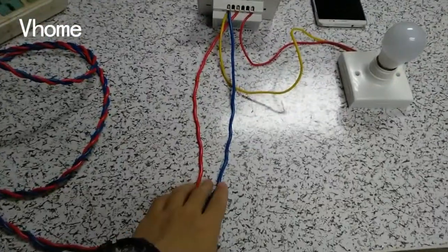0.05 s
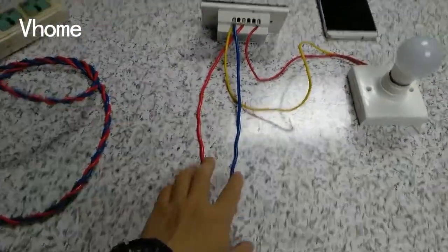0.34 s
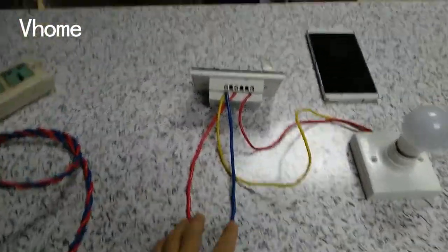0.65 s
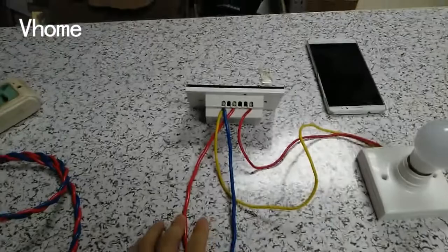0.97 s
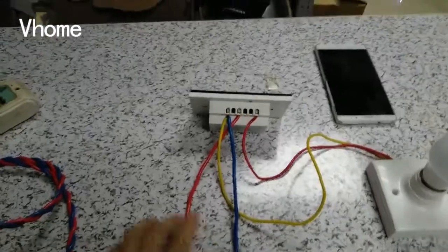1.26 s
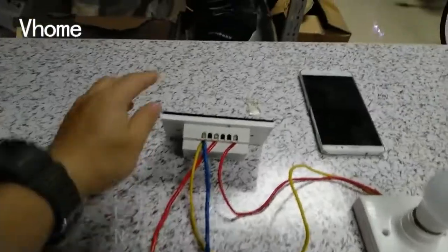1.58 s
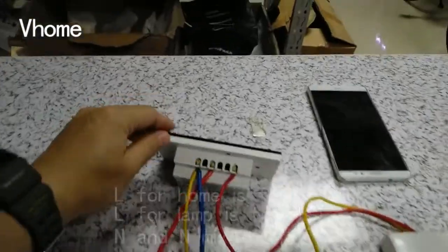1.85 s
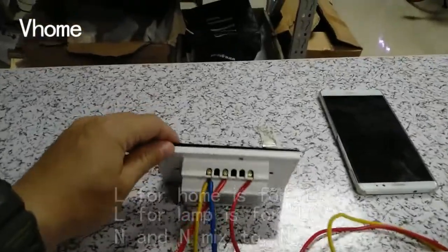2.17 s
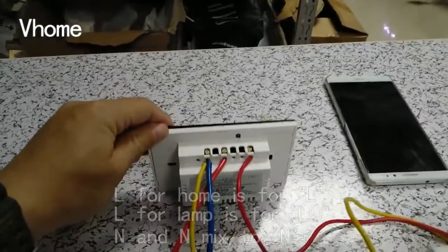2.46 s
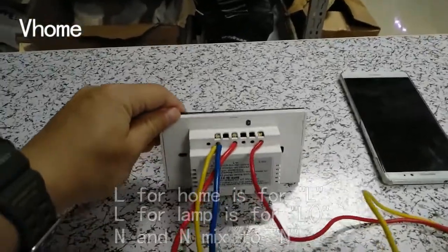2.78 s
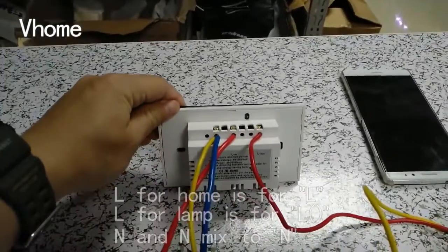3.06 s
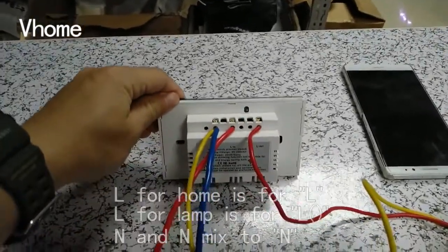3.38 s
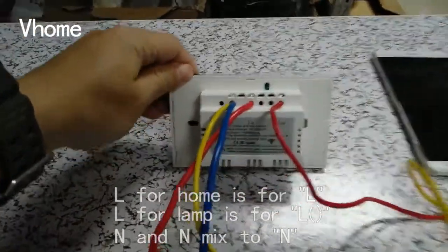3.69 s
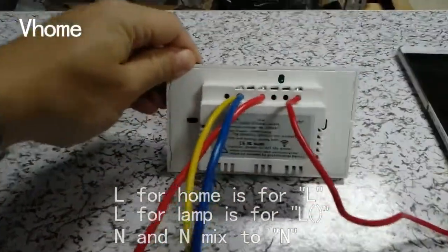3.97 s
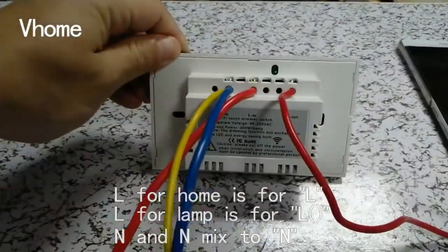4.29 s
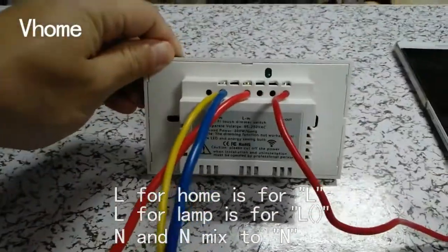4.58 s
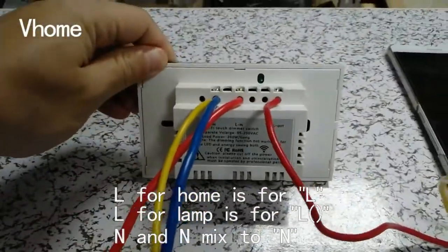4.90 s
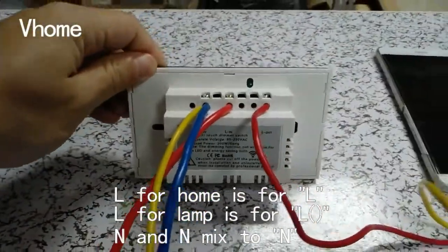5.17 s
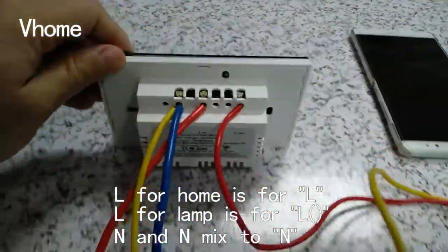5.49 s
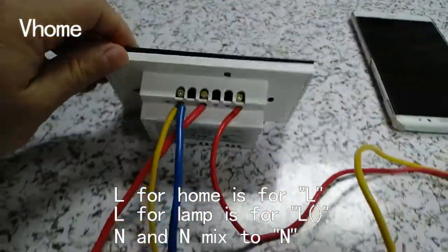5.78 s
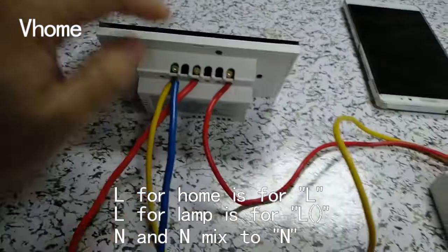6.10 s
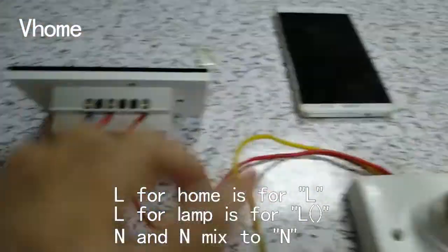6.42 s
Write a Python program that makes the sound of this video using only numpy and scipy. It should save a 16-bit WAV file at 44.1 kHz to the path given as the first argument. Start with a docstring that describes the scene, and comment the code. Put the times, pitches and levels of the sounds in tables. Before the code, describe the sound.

A wired plastic wall switch is handled on a stone countertop. A few sharp ticks and light clacks come first, then fingers brush softly over the wires. The plate drags and knocks as it is tipped up. Near the end it is set down with a louder clacking knock, followed by one bright click. The sounds are close, over a low room rumble, high hiss and a faint whine.

```python
"""A quiet room with a stone countertop, a stereo pair of microphones close to the stone.
A wired plastic wall switch is tipped up and set back down: its plate drags, clacks and knocks on the
counter, fingers rustle over the wires, and the stressed plastic gives tiny bright ticks.
Behind it: the rumble of the room, a band of high hiss and a faint whine that comes and goes."""
import sys
import numpy as np
from scipy import signal
from scipy.fft import rfft, irfft, next_fast_len
from scipy.io import wavfile
from scipy.ndimage import uniform_filter1d

SR = 44100
rng = np.random.default_rng(int(sys.argv[2]) if len(sys.argv) > 2 else 0)


def dump_mix(stems):
    """Bounce the given channels to the path in sys.argv[1] as a 16-bit WAV at rate SR."""
    frames = np.atleast_2d(stems).T  # one column per channel
    limited = np.clip(frames, -1, 1)  # hard clip at full scale
    pcm = np.round(limited * 32767).astype(np.int16)
    wavfile.write(sys.argv[1], SR, pcm)


N = 284445

# how alike the room sounds at the two microphones: (frequency [Hz], coherence [0..1])
ROOM_COHERENCE = [(30, 0.049), (60, 0.86), (130, 0.96), (290, 0.98), (640, 0.11), (1400, 0.057)]


def gain_of(db):
    """Decibels to amplitude."""
    return 10 ** (np.asarray(db) / 20)


def unit_rms(x):
    """Scales to rms 1."""
    return x / np.sqrt(np.mean(x ** 2) + 1e-20)


def curve_at(points, hz):
    """Reads a table on a log-frequency axis."""
    f, value = np.transpose(points)
    return np.interp(np.log(hz + 1), np.log(f + 1), value)


def pan(balance_db):
    """Left and right gains; a positive balance leans left."""
    return gain_of(np.array([[.5], [-.5]]) * balance_db)


def add(mix, start_s, sound):
    """Mixes a stereo sound in at start_s."""
    part = mix[:, round(start_s * SR):][:, :sound.shape[1]]
    part += sound[:, :part.shape[1]]


def coloured(x, colour):
    """Gives x a spectrum, at rms 1."""
    size = next_fast_len(x.shape[1])
    gain = gain_of(curve_at(colour, np.fft.rfftfreq(size, 1 / SR)))
    return unit_rms(irfft(rfft(x, size) * gain, size)[:, :x.shape[1]])


def resonance(x, hz, width_hz):
    """Passes x through a steep-sided resonance, at rms 1."""
    for _ in range(3):
        x = signal.lfilter(*signal.iirpeak(hz, hz / width_hz, fs=SR), x)
    return unit_rms(x)


def drift(per_s):
    """Slow random wander of rms 1."""
    knots = np.arange(0, N / SR + 1, 1 / per_s)
    return unit_rms(np.interp(np.arange(N) / SR, knots, rng.standard_normal(len(knots))))


def stroke(peak_s, half_length_s, rise=0.91, fall=1.02):
    """The swell of one stroke, which bites a little faster than it trails off."""
    t = np.arange(N) / SR - peak_s
    return np.exp(-.5 * (t / (half_length_s * np.where(t < 0, rise, fall))) ** 2)


def strokes(rows):
    """The envelope of several strokes, added in power."""
    return np.sqrt(sum((gain_of(db) * stroke(s, half_length)) ** 2 for s, db, half_length in rows))


def friction(colour, patchy_db, grain_db, patch_bins):
    """A fine-grained rub whose frequency bands swell and fade at random."""
    spectra = signal.stft(rng.standard_normal((2, N)), nperseg=512)[2]
    patches = uniform_filter1d(rng.standard_normal(spectra.shape[1:]), size=patch_bins, axis=0)
    patches = unit_rms(uniform_filter1d(patches, size=14, axis=1))
    rub = signal.istft(spectra * gain_of(patchy_db * np.tanh(patches)))[1][:, :N]
    return coloured(rub * gain_of(grain_db * drift(300)), colour)


def room_rumble(level_db=-54):
    """The steady air of the room, alike at both microphones in the bass only."""
    # room tone: (frequency [Hz], relative level [dB])
    colour = [(12, -72), (22, -61), (45, -13), (65, -19.5), (86, -4), (107, -12.5), (134, 1.5), (167, -4.5),
              (196, 2), (226, -4), (271, -3), (306, -1.5), (528, -12.5), (967, -11.5), (2080, -32),
              (2500, -37), (3250, -70), (5500, -120)]
    size = next_fast_len(N)
    left, other = rfft(rng.standard_normal((2, size)))
    coherence = curve_at(ROOM_COHERENCE, np.fft.rfftfreq(size, 1 / SR))
    right = coherence * left + np.sqrt(1 - coherence ** 2) * other
    pair = irfft(np.array([left, right]), size)[:, :N]
    return gain_of(level_db) * coloured(pair, colour) * pan(-1.45)


def hiss_and_whine(whine_hz=8001, flicker_db=1.5, wander_db=0.6, waver_db=2):
    """A flickering band of high hiss, left of centre, with a thin wavering whine in it."""
    # band of the hiss: (frequency [Hz], relative level [dB])
    colour = [(2000, -66), (5000, -71), (6000, -9), (7000, 6), (8000, 14.5), (9000, 13), (10000, 11),
              (10700, 2), (11500, -39), (15000, -59)]
    # slow rise and fall of each: (time [s], level [dB])
    hiss_levels = [(0, -51), (0.05, -58), (0.12, -54.5), (0.35, -55), (0.65, -59.5), (0.9, -54), (1.6, -56),
                   (1.75, -55), (2.25, -53), (2.43, -59), (2.52, -52.5), (2.7, -56), (3.5, -55.5),
                   (3.8, -56), (4.3, -56.5), (4.7, -57), (5.35, -54.5), (5.7, -54), (6.05, -57.5),
                   (6.45, -56)]
    whine_levels = [(0, -63), (0.6, -71), (0.95, -69), (1.3, -66), (2.1, -70), (2.6, -65), (3.3, -79),
                    (3.8, -77), (4.4, -71), (4.9, -68), (6.0, -89), (6.4, -62)]
    t = np.arange(N) / SR
    hiss_db = np.interp(t, *np.transpose(hiss_levels)) + flicker_db * drift(20) + wander_db * drift(6)
    whine_db = np.interp(t, *np.transpose(whine_levels)) + waver_db * drift(6.7)
    hiss = gain_of(hiss_db) * coloured(rng.standard_normal((2, N)), colour) * pan(4)
    return hiss + gain_of(whine_db) * np.sqrt(2) * np.sin(2 * np.pi * whine_hz * t)


def room_tail(x):
    """The room answers with sparse reflections of random sign, each band dying at its own speed."""
    # reverberation time: (frequency [Hz], t60 [s])
    decay = [(100, 0.31), (300, 0.2), (1000, 0.48), (4000, 0.51), (10000, 0.073)]
    taps = np.zeros((2, SR // 2))
    slots = np.arange(300, SR // 2 - 20, 20)
    arrivals = slots + rng.integers(0, 20, (2, len(slots)))
    np.put_along_axis(taps, arrivals, rng.choice([-1., 1.], arrivals.shape), 1)
    hz, t, spectra = signal.stft(taps, SR, nperseg=256)
    coherence = curve_at(ROOM_COHERENCE, hz)[:, None]
    spectra[1] = coherence * spectra[0] + np.sqrt(1 - coherence ** 2) * spectra[1]
    tail = signal.istft(spectra * gain_of(-60 * t / curve_at(decay, hz)[:, None]), SR)[1]
    return signal.fftconvolve(x.mean(0)[None], tail / np.linalg.norm(tail[0]), axes=1)[:, :N]


def pings(rows):
    """One heavily damped resonance a row, swelling and dying within milliseconds."""
    out, t = np.zeros((2, N)), np.arange(SR // 20) / SR
    lag_s = np.array([[1.5e-5], [0]])  # the left microphone hears it a little later
    for s, db, hz, balance_db, swell_ms in rows:
        age = 1000 * t / swell_ms
        swell = age ** 2 * np.exp(-age)
        tone = np.sin(2 * np.pi * hz * (t - lag_s))
        add(out, s, gain_of(db) * pan(balance_db) * swell / swell.max() * tone)
    return out


def microphone_bumps():
    """A finger bumps the housing near one microphone, so each bump is heard to one side."""
    # (time [s], level [dB], pitch [Hz], balance [dB], swell time [ms])
    bumps = [(3.096, -50, 950, -11, 2.3), (3.328, -47, 210, 28, 1.25), (3.329, -48, 1120, 20, 0.7),
             (3.331, -53, 524, 10, 2.6)]
    return pings(bumps)


def plate_drag(rest_db=-61):
    """The plate slides on the stone and never sits quite still under the hand."""
    # pushed, tipped up and let go: (time [s], level [dB], half-length [s])
    slides = [(1.78, -58.5, 0.21), (2.36, -53.5, 0.11), (3.1, -57.5, 0.15), (3.57, -58, 0.14),
              (5.73, -59, 0.32), (6.27, -59.5, 0.19)]
    # plastic dragging on stone: (frequency [Hz], relative level [dB])
    colour = [(60, -4), (300, 0.5), (600, -4.5), (900, 4.5), (1200, 4), (1550, -3), (2000, -6.5),
              (3000, -23), (6000, -110)]
    sliding = np.hypot(strokes(slides), gain_of(rest_db))
    return friction(colour, patchy_db=9, grain_db=0, patch_bins=2) * sliding


def hand_rustle():
    """The hand rubs over wires and plate."""
    # strokes of the hand: (time [s], level [dB], half-length [s])
    rubs = [(0.11, -61.5, 0.055), (0.276, -57, 0.024), (0.59, -64, 0.028), (1.5, -66, 0.091),
            (1.91, -57.5, 0.044), (2.1, -64, 0.19), (2.33, -52.5, 0.034), (3.1, -62, 0.14),
            (3.48, -59, 0.055), (5.815, -60, 0.065), (6.27, -56.5, 0.14)]
    # their rustle: (frequency [Hz], relative level [dB])
    colour = [(700, -1), (1500, -5), (2500, 6.5), (3300, 0), (4200, -5.5), (5500, -24), (8000, 8.5),
              (13000, -54), (16000, -48)]
    return friction(colour, patchy_db=4.4, grain_db=2.6, patch_bins=7) * strokes(rubs) * pan(0.5)


def brush_and_grip(grip_db=-70, wander_db=5.5, shifts_per_s=11, stir_db=-7.5, balance_db=9.5):
    """On the left, fingertips brush the wires and stir the lower rustle of a faintly shifting grip."""
    # fingertip strokes: (time [s], level [dB], half-length [s])
    brushes = [(0.0, -59, 0.035), (0.15, -58, 0.036), (0.80, -80, 0.015), (0.96, -56.5, 0.024),
               (1.19, -63.5, 0.041), (1.78, -53.5, 0.01), (1.855, -55, 0.043), (1.95, -61, 0.027),
               (2.09, -57.5, 0.028), (2.18, -57, 0.035), (2.6, -60, 0.028), (2.78, -61, 0.043),
               (2.9, -64, 0.047), (3.01, -58, 0.046), (3.36, -65, 0.016), (3.555, -54, 0.037),
               (3.62, -66, 0.049), (3.87, -59.5, 0.033), (4.89, -61.5, 0.037), (5.115, -54.5, 0.027),
               (5.165, -62, 0.035), (5.79, -55, 0.035), (5.97, -68, 0.073), (6.27, -56, 0.024),
               (6.375, -56.5, 0.052)]
    # friction of each: (frequency [Hz], relative level [dB])
    brush_colour = [(4000, -79), (6500, 7.5), (8500, 6), (10300, 11), (11500, 6), (13500, 5.5),
                    (14500, -14), (16000, -10)]
    grip_colour = [(1000, -30), (2500, 3), (3500, -1.5), (5000, -6.5), (6000, -3.5), (10000, 8.5),
                   (11500, -4), (16000, -44)]
    brushing = strokes(brushes)
    brush = friction(brush_colour, patchy_db=7, grain_db=2, patch_bins=4) * brushing
    shifting = gain_of(grip_db + wander_db * drift(shifts_per_s))
    gripping = np.hypot(shifting, gain_of(stir_db) * brushing)
    grip = friction(grip_colour, patchy_db=9, grain_db=2.5, patch_bins=3) * gripping
    return brush * pan(balance_db), grip * pan(balance_db)


def scuffs(trim_db=-1, grain_db=0.5):
    """Fingers and plate edge scuff, each time on one resonance."""
    # (time [s], level [dB], half-length [s], pitch [Hz], bandwidth [Hz])
    contacts = [(0.095, -65, 0.0096, 2670, 500), (0.263, -55, 0.008, 3020, 3000),
                (0.29, -57.5, 0.037, 4670, 4250), (0.58, -64, 0.049, 3700, 2660),
                (0.806, -51, 0.021, 9300, 3480), (0.921, -52, 0.007, 8150, 1800),
                (0.955, -51, 0.017, 8800, 3500), (0.993, -66, 0.054, 3280, 1500),
                (1.12, -66.5, 0.038, 3370, 500), (1.192, -46, 0.013, 8350, 3460),
                (1.47, -67, 0.023, 2860, 1500), (1.745, -57.5, 0.021, 1500, 820),
                (1.913, -57, 0.04, 3120, 1310), (2.054, -62.5, 0.4, 770, 188),
                (2.107, -62, 0.034, 3330, 1500), (2.314, -59, 0.076, 1526, 130),
                (2.61, -49.5, 0.019, 8550, 3500), (2.885, -61, 0.037, 2300, 1400),
                (3.249, -50.5, 0.024, 8750, 2800), (3.355, -66, 0.071, 2380, 900),
                (3.438, -45, 0.006, 8440, 2000), (3.486, -47.5, 0.013, 9400, 2000),
                (3.773, -64.5, 0.03, 4930, 1800), (4.152, -69, 0.039, 4400, 260),
                (4.228, -70, 0.03, 3200, 500), (4.586, -86, 0.05, 3600, 700),
                (5.146, -66, 0.026, 3700, 2000), (5.24, -65.5, 0.025, 5600, 2000),
                (5.316, -72.5, 0.032, 3540, 1800), (5.563, -71, 0.034, 3080, 2500),
                (5.813, -53, 0.039, 4020, 6000), (6.313, -49, 0.012, 10000, 1500)]
    noise = rng.standard_normal((2, N)) * gain_of(grain_db * drift(400))
    scuffing = sum(gain_of(db) * stroke(s, half_length) * resonance(noise, hz, width_hz)
                   for s, db, half_length, hz, width_hz in contacts)
    return gain_of(trim_db) * scuffing * pan(5.5)


def handling(pressure_db=3, slips_per_s=55):
    """All the close friction; the fingers stick and slip, so their rubs are uneven."""
    drag, rustle = plate_drag(), hand_rustle()
    brush, grip = brush_and_grip()
    rubbing = rustle + brush + scuffs()
    pressure = unit_rms(gain_of(pressure_db * drift(slips_per_s)))
    return drag + grip + pressure * rubbing


def plastic_ticks(low_cut_hz=5900):
    """Stressed plastic gives tiny snaps, heard only in the treble."""
    # (time [s], level [dB], pitch [Hz], balance [dB], swell time [ms])
    snaps = [(0.1440, -18.5, 8440, 1, 0.11), (0.1478, -27, 8750, -12, 0.043), (0.228, -43, 9000, 0, 0.57),
             (0.7945, -41, 9500, 0, .3), (0.9157, -41, 8000, 10, 0.52), (1.1776, -40, 9100, 3.5, .3),
             (1.772, -38, 8300, 3.5, 0.23), (3.225, -42, 8160, 1, .4), (3.3846, -41, 8550, 4, .4),
             (3.4775, -37, 9300, -2, 0.44), (3.6955, -40.5, 7740, 7, 0.69), (5.7597, -35.5, 9200, 2, 0.2),
             (6.2257, -43, 8670, 6, .3), (6.3079, -11, 9860, -1, 0.19), (6.3083, -25, 12300, 0, 0.063),
             (6.3095, -33, 10000, -2, 0.31), (6.3742, -35, 8340, -2, 0.37), (6.4075, -33, 10100, -5, 0.088)]
    return signal.sosfilt(signal.butter(4, low_cut_hz, "high", fs=SR, output="sos"), pings(snaps))


def corner_catches():
    """A hard corner catches: one sharp pressure front that swings back within a millisecond."""
    # (time [s], level [dB], balance [dB], width [ms])
    catches = [(0.2582, -36, -10, .15), (5.775, -34, 0, .15), (5.7776, -34, 0, .2), (5.7972, -40, 2, .05),
               (5.8154, -29, 0, .1), (5.8165, -30, -2, .05)]
    out, t = np.zeros((2, N)), np.arange(SR // 100) / SR
    for s, db, balance_db, width_ms in catches:
        age = 1000 * t / width_ms
        pulse = age * (2 - age) * np.exp(-age)
        add(out, s, -gain_of(db) * pan(balance_db) * pulse / pulse.max())
    return out


def edge_clacks(trim_db=-10, ring_db=-3, ring_width_hz=1400):
    """Plastic cracks on stone: dense, fast-dying resonances, one standing out; soft hits are duller."""
    # the edge lands: (time [s], level [dB], balance [dB], ring pitch [Hz], t60 [s], treble corner [Hz])
    hits = [(0.096, -42.5, 2, 2490, 0.24, 6000), (0.249, -42, -4, 1300, 0.026, 9000),
            (0.2545, -33, 10, 9000, 0.023, 9000), (0.2581, -29, -12, 2880, 0.011, 6000),
            (0.2635, -43, -2, 2620, 0.012, 8000), (0.272, -37, -2, 1500, .025, 4500),
            (0.578, -34.5, 4, 1950, 0.025, 4000), (1.873, -42, 4, 3170, 0.05, 4500),
            (2.463, -35, 8, 800, 0.031, 990), (3.328, -38, 9, 2000, 0.035, 1800),
            (5.775, -29.5, 1, 1410, 0.038, 9000), (5.7782, -32, 4, 1780, 0.032, 4500),
            (5.797, -33, 7, 3500, 0.02, 14000), (5.8147, -24, 5, 1800, 0.013, 14000),
            (5.822, -34, 0, 950, 0.05, 1500), (5.847, -36, -2, 1300, 0.02, 2000),
            (6.2616, -37, 0, 1990, 0.013, 4000)]
    # the crack: (frequency [Hz], relative level [dB])
    colour = [(200, 1), (600, 16.5), (1000, 12.5), (1550, 11), (2300, 1), (3200, 12), (4600, 2),
              (6000, 12.5), (9000, 21.5), (12000, 12), (14000, -20)]
    out, t = np.zeros((2, N)), np.arange(SR // 4) / SR
    for s, db, balance_db, hz, t60, treble_hz in hits:
        noise = rng.standard_normal((2, len(t)))
        crack = coloured(noise, colour) + gain_of(ring_db) * resonance(noise, hz, ring_width_hz)
        crack *= gain_of(trim_db + db - 60 * t / t60) * pan(balance_db)
        add(out, s, signal.lfilter(*signal.butter(2, treble_hz, fs=SR), crack))
    return out


def counter_knocks(attack_s=0.001):
    """Each blow rings switch and counter; a softer contact leaves the high modes out."""
    # the switch bumps the counter: (time [s], level [dB], treble corner [Hz], bass corner [Hz])
    blows = [(0.258, -49, 400, 150), (1.753, -40, 497, 150), (1.7771, -39, 490, 150),
             (2.4524, -37.5, 500, 120), (2.4622, -27, 1290, 140), (2.482, -41, 900, 120),
             (2.497, -46, 485, 122), (4.836, -46, 400, 120), (5.454, -38, 500, 120), (5.776, -43, 2500, 70),
             (5.815, -14.5, 2780, 183), (5.8502, -27.5, 149, 90)]
    # modes of switch and counter: (frequency [Hz], relative level [dB], t60 [s])
    body_modes = [(144, -17, 0.19), (207, -4.5, 0.065), (271, 0, 0.08), (281, -7, 0.15),
                  (312.6, -12.5, 0.16), (508, -8, 0.043), (574, -15, 0.032), (663, -23.5, 0.14),
                  (810, -11, 0.038), (1042, -17, 0.096), (1174, -12.5, 0.026), (1234, -15, 0.032),
                  (1550, -8, 0.032), (1910, -36, 0.017), (2270, -22, 0.04), (2380, -24, 0.1),
                  (2770, -36, 0.024), (4230, -22, 0.06), (4600, -11, 0.035)]
    out, t = np.zeros((2, N)), np.arange(SR // 3) / SR
    hz, mode_db, t60 = np.transpose(body_modes)[:, :, None]
    for s, db, treble_hz, bass_hz in blows:
        # a small plate radiates little bass, least when it lands on an edge
        bass_cut = signal.butter(3, bass_hz, "high", fs=SR)
        # high modes reach the two microphones out of step
        phase = rng.standard_normal((2, len(body_modes), 1)) * np.minimum((hz / 1000) ** 2, 2)
        envelopes = gain_of(mode_db - 60 * t / t60) / np.hypot(1, (hz / treble_hz) ** 2)
        modes = envelopes * np.sin(2 * np.pi * hz * t + phase)
        ring = signal.lfilter(*bass_cut, modes.sum(1) * (1 - np.exp(-t / attack_s)))
        add(out, s, -gain_of(db) * ring / abs(ring).max())
    return out * pan(-1.8)


def scene(knock_wet_db=-20, clack_wet_db=-7, tick_wet_db=-19):
    """The switch close up over the background; only knocks, clacks and ticks set off the room's tail."""
    knocks, clacks, ticks = counter_knocks(), edge_clacks() + corner_catches(), plastic_ticks()
    close = knocks + clacks + ticks + microphone_bumps() + handling()
    send = gain_of(knock_wet_db) * knocks + gain_of(clack_wet_db) * clacks + gain_of(tick_wet_db) * ticks
    return close + room_rumble() + hiss_and_whine() + room_tail(send)


def record(dry):
    """The recorder's band limit, a steep low-pass."""
    low_pass = signal.firwin(255, cutoff=15900, window=("kaiser", 9), fs=SR)
    return signal.oaconvolve(dry, low_pass[None], "same", axes=1)


dry = scene()
out = record(dry)
dump_mix(out)
```